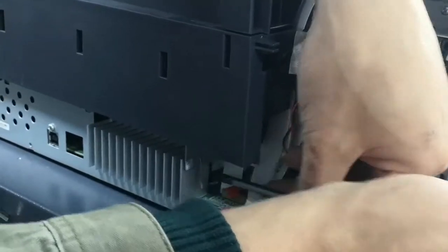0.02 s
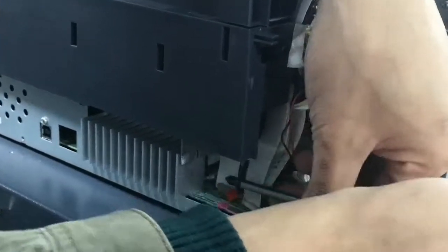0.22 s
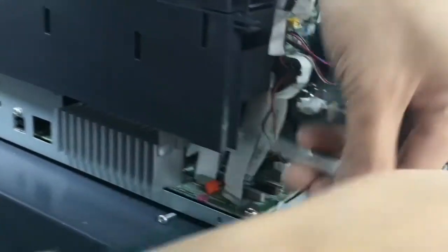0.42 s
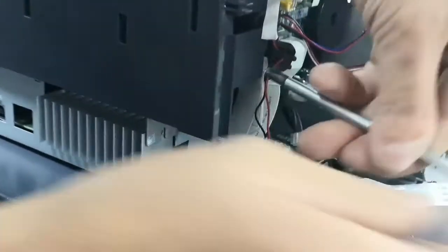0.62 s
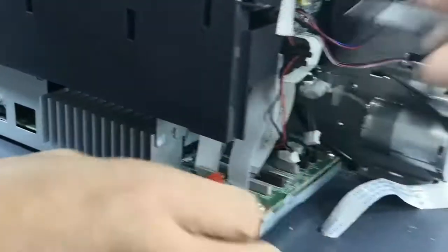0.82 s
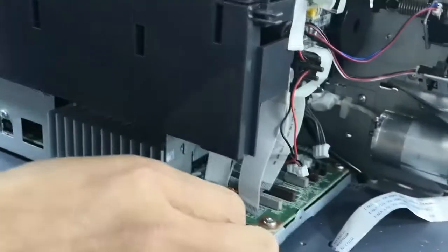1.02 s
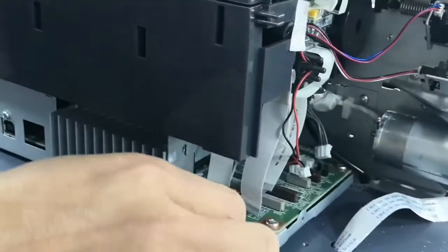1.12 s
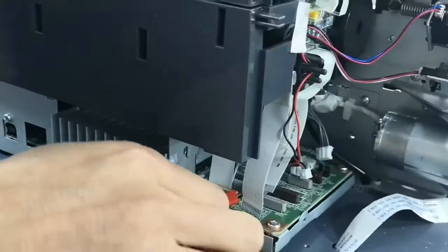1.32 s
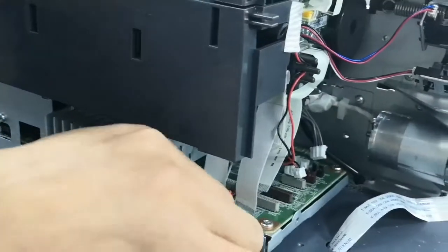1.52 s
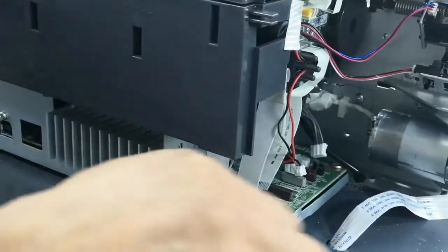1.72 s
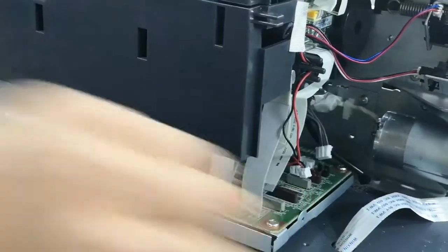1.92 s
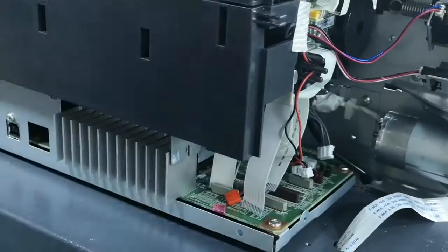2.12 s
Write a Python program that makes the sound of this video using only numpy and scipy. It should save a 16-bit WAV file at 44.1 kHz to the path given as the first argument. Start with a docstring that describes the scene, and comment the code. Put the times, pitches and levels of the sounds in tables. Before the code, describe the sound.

A screwdriver clatters against a steel frame and knocks on plastic, then a faint click.

```python
"""Light plastic taps come first, as a screwdriver is drawn out of an open printer. Its tip tinks on
a screw, the steel clatters against the ringing sheet-steel frame, and it knocks twice on the hollow
cover. Then a hand clicks a part on the circuit board and slides away. Hits are fast-dying noise bursts,
ringing metal is damped sines, and soft nudges boom in the case underneath.
Close stereo microphone in a small room with a low rumble."""
import sys
import numpy as np
from scipy import signal
from scipy.fft import rfft, irfft, next_fast_len
from scipy.io import wavfile

SR = 44100
rng = np.random.default_rng(int(sys.argv[2]) if len(sys.argv) > 2 else 0)


def wav_out(sig):
    """Save sig, one row per channel (or a flat mono array), as 16-bit PCM at SR to the path in sys.argv[1]."""
    wavfile.write(sys.argv[1], SR, np.round(np.clip(np.atleast_2d(sig).T, -1, 1) * 32767).astype(np.int16))


N = 97020
T = np.arange(SR * 2 // 3) / SR  # time within one hit [s]

# room tone spectra (frequency [Hz], level [dB])
RUMBLE_EQ = [(12, -38), (20, -4.5), (48, 1.5), (124, -9.5), (198, -11), (264, -20.5), (300, -18),
             (347, -25.5), (450, -25.5), (580, -60), (990, -120)]
HISS_EQ = [(240, -35), (400, -7.5), (562, -9.5), (687, -8.5), (719, -9.5), (921, -6), (1060, -5),
           (1250, -7.5), (1440, -6), (1730, -0.5), (2470, 0.5), (4310, -14), (7400, -10), (9320, -26.5),
           (16000, -28)]
# room decay (frequency [Hz], t60 [s])
ROOM_DECAY = [(300, 0.47), (2300, .43), (7500, 0.29), (10000, 0.14), (14000, 0.174)]
# stereo image (frequency [Hz], left-right likeness [0..1])
LIKENESS = [(60, .995), (150, 0.97), (300, 0.58), (650, 0), (1300, 0.11), (15000, 0)]
# the printer's body shades the left side (frequency [Hz], L-R [dB])
BODY_SHADOW = [(500, 0), (1200, -1), (2400, -8.5), (4400, -2), (8000, -1), (15000, 2.5)]

# the hand's nudges and the envelope of its slide (time [s], level [dB])
NUDGES = [(0.121, -54.5), (.17, -55), (.23, -54.5), (0.292, -48.5), (.35, -49.5), (.401, -49), (.52, -51.5),
          (.585, -49.5), (0.644, -48.5), (1.395, -53), (1.445, -55.5)]
SLIDE_ENVELOPE = [(1.5, -72), (1.63, -71.5), (1.74, -85.5), (1.80, -64.5), (1.84, -63), (1.88, -52),
                  (1.935, -53), (1.965, -69.5), (2.05, -85.5)]
# boom of the whole case (frequency [Hz], level [dB], t60 [s])
BOOM_MODES = [(128.6, -0.5, 0.49), (159.6, 0.5, 0.34), (200.6, -3, 0.38)]
# tone colour of each kind of contact (frequency [Hz], level [dB])
NUDGE_EQ = [(30, -65), (80, 4), (130, 2.5), (210, 0.5), (330, -6.5), (700, -41), (2000, -94)]
SLIDE_EQ = [(300, -31), (1200, -12), (2000, -0.5), (3300, -3.5), (5000, -3.5), (6500, 3.5), (7800, 5),
            (9000, -19), (10500, -25.5), (14500, -26.5), (16000, -44.5)]
TAP_EQ = [(100, -33.5), (450, -19.5), (850, -16.5), (1400, -5), (1850, -1), (2550, 1), (3300, -10),
          (4200, -10), (5200, -19.5), (7700, -12.5), (8800, -28.5), (10500, -39), (15000, -48),
          (16000, -83)]
COVER_EQ = [(100, -21.5), (400, -17.5), (620, -11.5), (850, -2), (1050, -12), (1320, -2.5), (1600, -17.5),
            (2020, 2), (2300, -6), (2730, 7), (3300, -9), (4100, -7), (4750, -4), (5300, -0.5),
            (6200, -11.5), (7630, -3.5), (8600, -24.5), (10500, -29.5), (14800, -42.5), (16000, -54)]
TICK_EQ = [(500, -21.5), (1500, -17), (2600, -16), (3400, -14), (4500, -12.5), (6000, -2.5), (7700, 6.5),
           (8800, -1.5), (13500, -24.5), (15000, -23), (16000, -19)]
CLACK_EQ = [(100, -36), (400, -25), (750, -13.5), (1300, -8.5), (1800, -1), (2700, -1), (3300, -5),
            (5000, -4), (6500, -3), (7800, 3), (8600, -9.5), (10300, -18.5), (14800, -26), (16000, -50)]

# small parts: pitches (frequency [Hz]) and one ping for each (time [s], level [dB], t60 [s])
PING_HZ = [4250, 4635, 2922, 2922]
PINGS = [(0.1467, -38, 0.057), (1.174, -62, 0.51), (1.454, -59, 0.78), (1.612, -62.5, 0.49)]
# the part that clicks on the board (frequency [Hz], level [dB], t60 [s])
CLICK_MODES = [(1780, -2, 0.086), (2280, 3, 0.092), (2865, -4, 0.091), (3700, -5.5, 0.085),
               (5990, 5.5, 0.039), (7448, -5, 0.053)]

# taps on plastic (time [s], level [dB], hollow body [dB], treble [dB], top edge [dB], t60 [s], L-R [dB])
PLASTIC_TAPS = [(0.0454, -49, 9.5, -4, 7, 0.17, -1), (0.059, -47.5, -11, 5, 0, 0.078, 13),
                (0.066, -34.5, -7, -3.5, -11, 0.086, -2), (0.0867, -39, -1.5, -2, -8, 0.056, -1),
                (0.1111, -36.5, -6.5, 1, 4.5, 0.052, 2), (0.1447, -41, 6, 9.5, -12, 0.038, -3),
                (0.156, -43, 12.5, 6, -7, 0.044, -1), (.602, -37, -25, -16, -22, 0.16, 5),
                (0.6235, -38, 11, -13, -10, .08, 1), (0.645, -42, 4, -4, 3, 0.1, -3),
                (0.6651, -39, -4, -1, -5, 0.11, 0), (0.684, -51, 15, 5, 6, 0.2, -1),
                (.7035, -43, -26, -5.5, 0, 0.092, -4), (1.106, -56.5, 5.5, -4, -1, 0.14, -3),
                (1.159, -57.5, 7.5, 0, 1.5, .1, 1.5), (1.172, -51.5, -11, 1, 0.5, 0.13, -0.5),
                (1.187, -52.5, -1, -5, -16.5, 0.25, 3), (1.439, -57, 4, 2, 4, .05, 2.5)]
# knocks on the cover (time [s], level [dB], hollow body [dB], treble [dB], top edge [dB], t60 [s],
# treble damping [exponent], L-R [dB])
COVER_KNOCKS = [(0.5709, -20, -7.5, 0, -2.5, 0.061, .9, 1.5), (0.5837, -23, 4.5, 5, 0.5, 0.092, 1, -1)]

# tip on a screw (time [s], ring level [dB], tick over ring [dB])
SCREW_TINKS = [(0.2209, -36.5, -4), (0.2475, -39.5, -17), (.3410, -38.5, -4), (0.3519, -34.5, -6)]
# tip and screw: pitches (frequency [Hz]) and the ring of each (level [dB], t60 [s])
TINK_HZ = [2390, 2540, 2700, 4360, 4600, 7560, 7740, 9650, 11920, 14630]
TINK_RING = [(2, 0.1), (-1, 0.24), (-9, .1), (1, 0.087), (-12.5, .12), (2.5, 0.051), (-7, 0.071), (-5, 0.1),
             (-12, .06), (-9.5, 0.033)]
# shaft modes, one list each (frequency [Hz]), (level [dB]), (t60 [s])
SHAFT_MODE_HZ = [2705, 4359, 4635, 5932, 6007, 7558]
SHAFT_DB, SHAFT_T60_S = [-36, -41, -42, -40, -45.5, -34], [.25, .7, .9, .3, .6, .11]

# steel on the frame (time [s], level [dB], hollow body [dB], treble [dB], top edge [dB], t60 [s],
# treble damping [exponent], ring trim [dB], L-R [dB])
FRAME_CLACKS = [(0.2481, -18.5, -10.5, 3.5, -4, 0.1, 0.79, -12, 4),
                (0.309, -28, -14.5, -4.5, -20, 0.15, 0.4, -25, 0.5),
                (0.3499, -26.5, -11, -4.5, -3.5, 0.18, 0.52, -5.5, 0),
                (0.4006, -16.5, -1, -4, 6, 0.07, 0.36, -6, 0.5), (.4418, -32.5, 16, 8, 4, .03, .2, -25, 15),
                (0.4467, -25.5, -4, -5.5, 7, 0.052, .35, -2.5, -2.5),
                (.4730, -27, -2, -1.5, -2.5, 0.048, .4, -12.5, -2.5),
                (.4850, -34, -1.5, 3, 0, 0.097, 0.18, -3.5, 1), (.521, -45, 2, 15, -3, 0.4, .1, -5, -0.5),
                (1.4440, -40.5, -0.5, 0, -2, 0.11, .1, -25.5, 1),
                (1.4535, -40.5, -3, -5.5, 1, 0.063, .35, -16, -3.5)]
# sheet-steel frame: pitches (frequency [Hz]) and the ring of each (level [dB], t60 [s])
SHEET_HZ = [1699, 1894, 2096, 2267, 2498, 2532, 2597, 2809, 3447, 3800, 4113, 5061, 5560, 6440, 6970, 7232,
            7425, 7836]
SHEET_RING = [(8, 0.092), (6.5, 0.22), (-14, .25), (-6.5, 0.52), (-9.5, 0.58), (-4, 0.25), (-19, 0.25),
              (-9, 0.66), (-23, .25), (-7, 0.25), (-12.5, 0.316), (-10.5, 0.32), (-0.5, .2), (8, 0.093),
              (-18.5, 0.11), (-2.5, 0.19), (-11, 0.189), (-7.5, 0.12)]

HOLLOW_HZ, TREBLE_HZ, EDGE_HZ = 1450, 3380, 7200  # shelf corners of a hit
ATTACK_S, HOLD_S, ROOM_RISE_S = 0.00068, 0.0035, 0.008
DAMPING_FROM_HZ = 2300  # above this, t60 falls as a power of frequency
PAN_FROM_HZ, PHASE_SPREAD_RAD = 705, 1.8


def amp(db):
    """Decibels to gain."""
    return 10 ** (np.asarray(db) / 20)


def along(points, hz):
    """Read a (frequency, value) curve on a log axis."""
    freqs, values = np.transpose(points)
    return np.interp(np.log(hz + 1), np.log(freqs + 1), values)


def above(hz, corner_hz):
    """A smooth shelf from 0 to 1 around the corner."""
    return 1 / (1 + (corner_hz / (hz + 1)) ** 8)


def add(out, s, x):
    """Mix x into out from time s."""
    part = out[:, max(round(s * SR), 0):][:, :x.shape[-1]]
    part += x[..., :part.shape[1]]


def sides(pan_db, hz):
    """Left and right gains; the bass stays in the middle."""
    balance_db = along(BODY_SHADOW, hz) + pan_db * above(hz, PAN_FROM_HZ)
    gains = amp(np.array([[.5], [-.5]]) * balance_db)
    return gains / np.sqrt(np.mean(gains ** 2, axis=0))


def noise(colour_db, pan_db, size):
    """Coloured stereo noise of rms 1, near mono in the bass."""
    hz = np.fft.rfftfreq(size, 1 / SR)
    width = np.arccos(np.clip(along(LIKENESS, hz), -1, 1)) / 2
    mid, side = rfft(rng.standard_normal((2, size))) * [np.cos(width), np.sin(width)]
    x = irfft(np.array([mid + side, mid - side]) * amp(colour_db(hz)) * sides(pan_db, hz), size)
    return x / np.sqrt(np.mean(x ** 2) + 1e-20)


def decay(x, t60_at):
    """After a short hold, each frequency dies at its own speed."""
    hz, t, spectrum = signal.stft(x, SR, nperseg=128)
    fade = amp(-60 * np.maximum(t - HOLD_S, 0) / t60_at(hz)[:, None])
    return signal.istft(spectrum * fade, SR)[1][:, :x.shape[1]]


def contact(eq, hollow_db, treble_db, edge_db, t60, damping, pan_db, room_db):
    """A noise burst for the crowded, damped modes of a struck part, then the room's tail."""
    colour = lambda hz: (along(eq, hz) + hollow_db * (1 - above(hz, HOLLOW_HZ))
                         + treble_db * above(hz, TREBLE_HZ) + edge_db * above(hz, EDGE_HZ))
    t60_at = lambda hz: t60 / np.maximum(hz / DAMPING_FROM_HZ, 1) ** damping
    burst = decay(noise(colour, pan_db, len(T)), t60_at) * (1 - np.exp(-T / ATTACK_S))
    tail = decay(noise(colour, pan_db, len(T)), lambda hz: along(ROOM_DECAY, hz))
    return burst + amp(room_db) * tail * (1 - np.exp(-T / ROOM_RISE_S))


def ring(modes, pan_db):
    """Damped sines; the higher ones reach left and right at different phases."""
    out = np.zeros((2, len(T)))
    for hz, db, t60 in modes:
        lag = PHASE_SPREAD_RAD * rng.uniform(-.5, .5) * above(hz, PAN_FROM_HZ) * np.array([[1], [-1]])
        wave = np.sin(2 * np.pi * (hz * T + rng.random()) + lag)
        out += sides(pan_db, np.array([hz])) * wave * amp(db + rng.standard_normal() - 60 * T / t60)
    return out * (1 - np.exp(-T / ATTACK_S))


def room_tone():
    """A bed of low rumble and faint hiss."""
    rumble = amp(-58) * noise(lambda hz: along(RUMBLE_EQ, hz), pan_db=-4, size=N)
    hiss = amp(-63.5) * noise(lambda hz: along(HISS_EQ, hz), pan_db=-0.5, size=N)
    return rumble + hiss


def hand(rise_s=0.011, thud_t60=0.35):
    """A brushing slide over the board, and soft nudges that set the case booming."""
    slide_db = np.interp(np.arange(N) / SR, *np.transpose(SLIDE_ENVELOPE), left=-120)
    out = amp(slide_db) * noise(lambda hz: along(SLIDE_EQ, hz), pan_db=-7.5, size=N)
    for s, db in NUDGES:
        thud = noise(lambda hz: along(NUDGE_EQ, hz), pan_db=0, size=len(T)) * amp(-60 * T / thud_t60)
        boom = amp(-3) * ring(BOOM_MODES, pan_db=0)
        add(out, s, amp(db) * (thud + boom) * (1 - np.exp(-T / rise_s)))
    return out


def small_parts(click_s=1.4538):
    """A part clicks on the board; others ping faintly when touched."""
    out = np.zeros((2, N))
    add(out, click_s, amp(-42.5) * ring(CLICK_MODES, pan_db=-6))
    for hz, (s, db, t60) in zip(PING_HZ, PINGS):
        add(out, s, ring([(hz, db, t60)], pan_db=-3.5))
    return out


def plastic_hits():
    """The tool taps dully on the connectors and knocks twice on the hollow cover."""
    out = np.zeros((2, N))
    for s, db, *tone, pan_db in PLASTIC_TAPS:
        add(out, s, amp(db) * contact(TAP_EQ, *tone, damping=0.18, pan_db=pan_db, room_db=-9.5))
    for s, db, *knock in COVER_KNOCKS:
        add(out, s, amp(db) * contact(COVER_EQ, *knock, room_db=-17))
    return out


def tip_and_shaft(shaft_struck_s=0.249):
    """The tip tinks brightly on a screw; one blow leaves the shaft ringing."""
    out = np.zeros((2, N))
    for s, db, tick_db in SCREW_TINKS:
        tick = contact(TICK_EQ, hollow_db=0, treble_db=-5, edge_db=-4, t60=0.068,
                       damping=0.12, pan_db=4.5, room_db=-9)
        tink = ring(np.column_stack([TINK_HZ, TINK_RING]), pan_db=3)
        add(out, s, amp(db) * (tink + amp(tick_db) * tick))
    add(out, shaft_struck_s, ring(zip(SHAFT_MODE_HZ, SHAFT_DB, SHAFT_T60_S), pan_db=-4.5))
    return out


def frame_clatter(ring_db=-11.5, thin_hz=2100, thin_share=0.8):
    """Hard clacks set the steel frame ringing; thin contacts hardly wake its low modes."""
    out = np.zeros((2, N))
    for s, db, hollow_db, *tone, trim_db, pan_db in FRAME_CLACKS:
        # most of the hollow-body gain reaches up to thin_hz and shapes both clack and ring
        shelf = lambda hz: thin_share * hollow_db * (1 - above(hz, thin_hz))
        eq = [(hz, level + shelf(hz)) for hz, level in CLACK_EQ]
        modes = [(hz, level + shelf(hz), t60) for hz, (level, t60) in zip(SHEET_HZ, SHEET_RING)]
        clack = contact(eq, (1 - thin_share) * hollow_db, *tone, pan_db, room_db=-11.5)
        add(out, s, amp(db) * (clack + amp(ring_db + trim_db) * ring(modes, pan_db)))
    return out


def scene():
    """All the layers at the microphone."""
    return frame_clatter() + plastic_hits() + tip_and_shaft() + small_parts() + hand() + room_tone()


def record(dry, top_hz=16000):
    """A brick-wall low-pass on the mix."""
    size = next_fast_len(N + SR // 2)
    passband = np.fft.rfftfreq(size, 1 / SR) < top_hz
    return irfft(rfft(dry, size) * passband, size)[:, :N]


dry = scene()
out = record(dry)
wav_out(out)
```